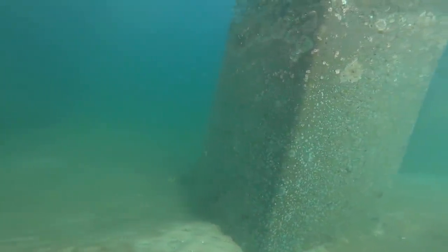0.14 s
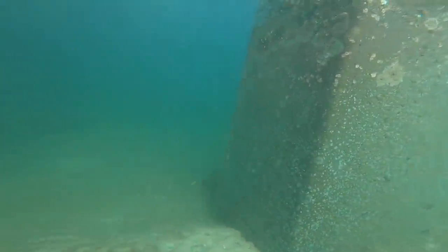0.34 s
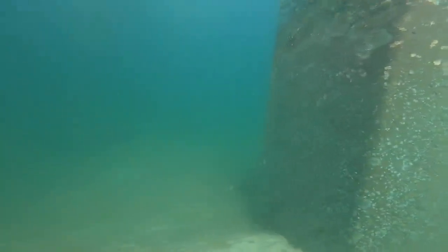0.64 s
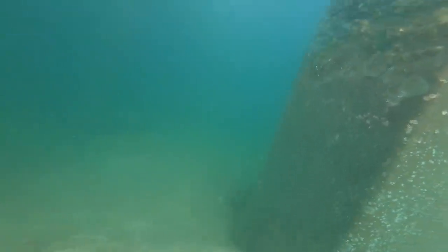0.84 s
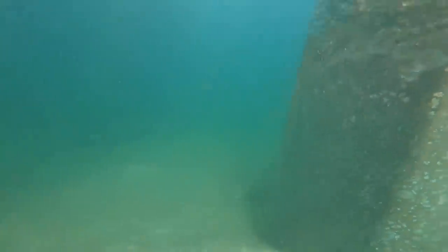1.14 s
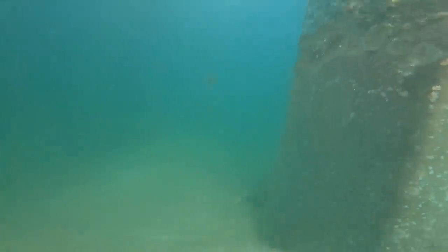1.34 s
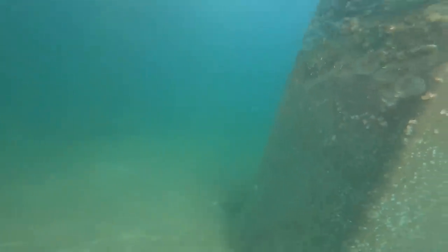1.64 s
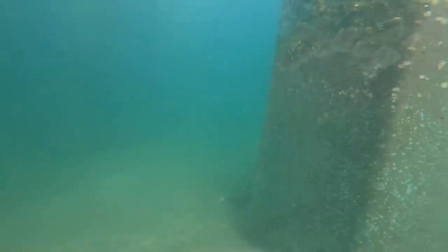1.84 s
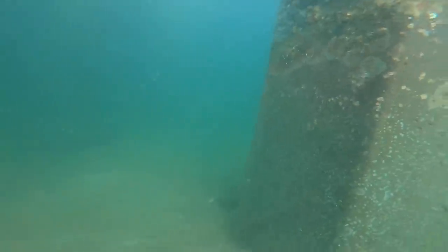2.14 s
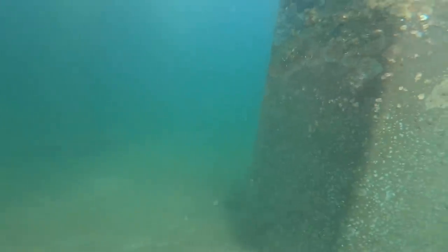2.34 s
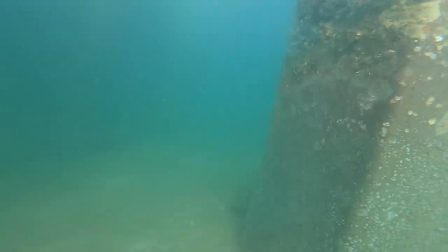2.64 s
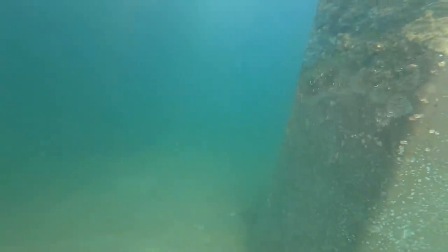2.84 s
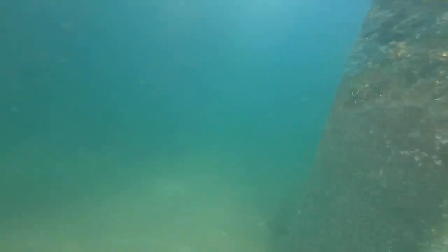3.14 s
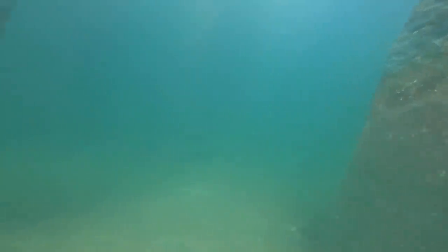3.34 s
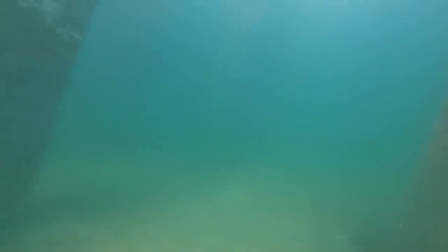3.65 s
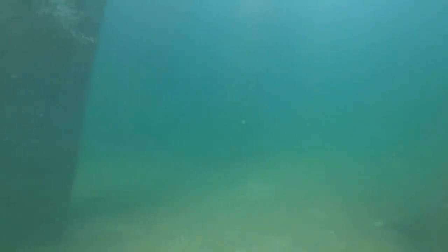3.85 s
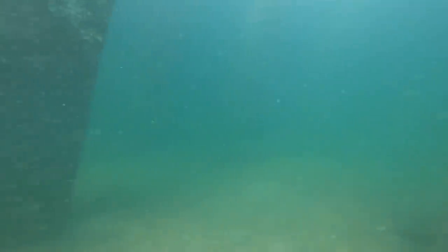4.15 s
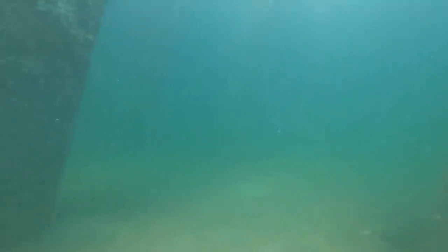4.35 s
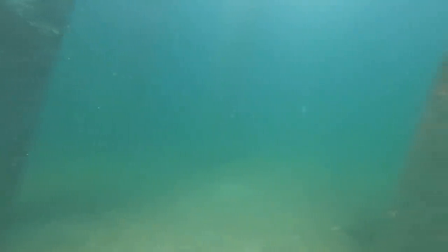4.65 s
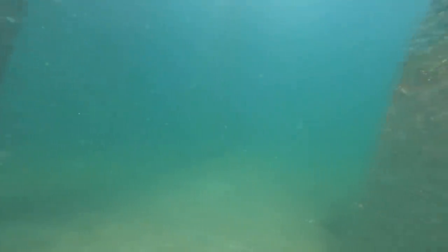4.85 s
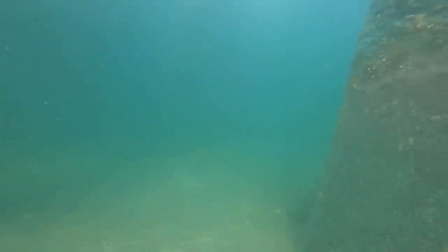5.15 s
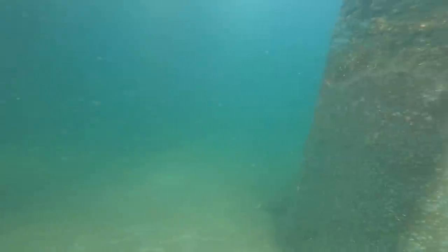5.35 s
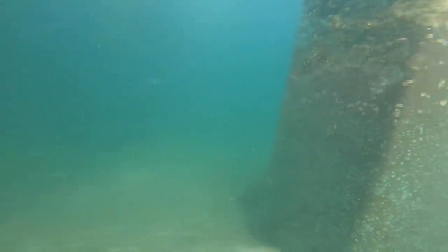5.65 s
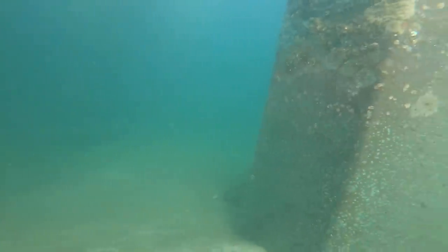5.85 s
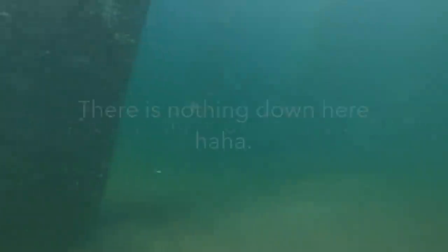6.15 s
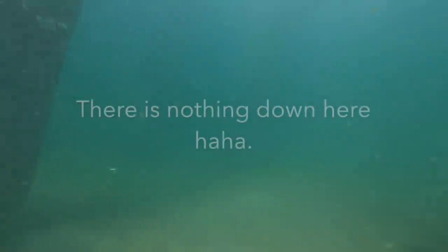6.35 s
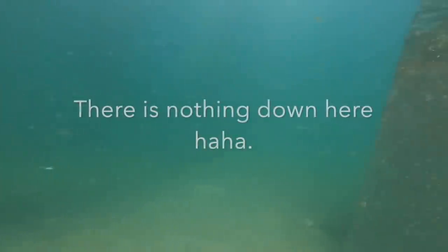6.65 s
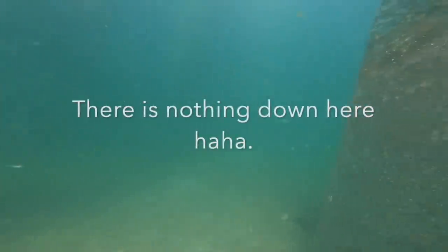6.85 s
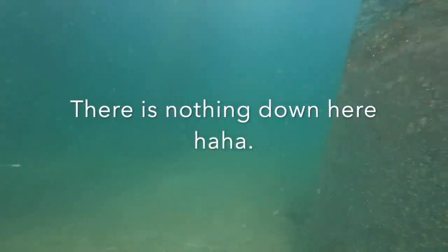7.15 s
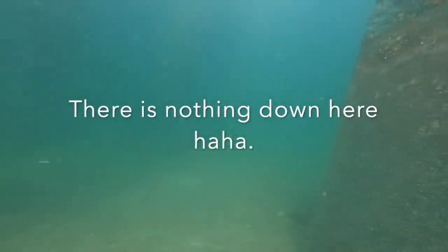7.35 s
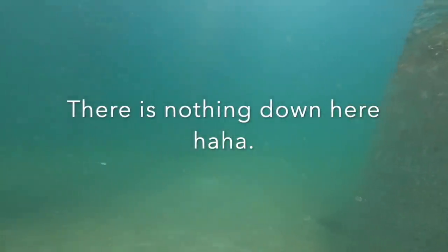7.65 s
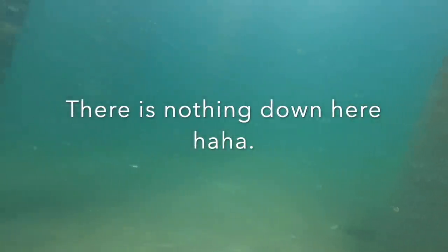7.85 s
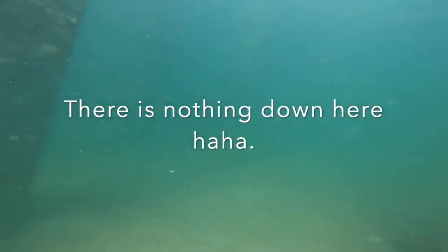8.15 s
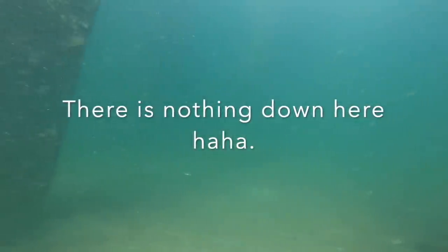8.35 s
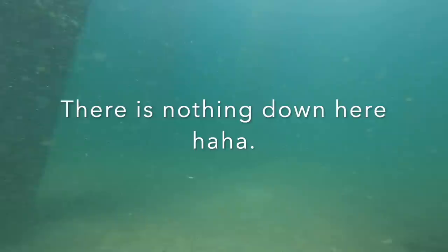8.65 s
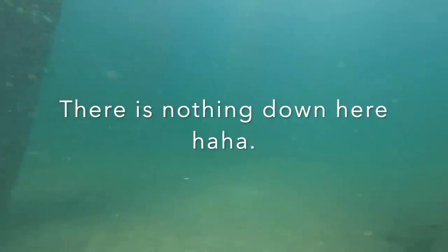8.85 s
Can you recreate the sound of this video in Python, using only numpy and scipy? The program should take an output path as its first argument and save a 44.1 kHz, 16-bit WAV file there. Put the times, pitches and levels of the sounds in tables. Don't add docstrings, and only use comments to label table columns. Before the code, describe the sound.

A submerged camera in a sealed housing picks up continuous shrimp crackle over a dull, mid-heavy hiss. Irregular snaps come close and far, with short watery echoes. Rattling knocks come first, then deep pressure thumps mainly on the left, after which the stereo narrows and slowly reopens. Two strong hollow knocks stand out in the second half, among small low bubble notes, and the crackling carries on to the end.

```python
import sys
import numpy as np
from scipy import signal
from scipy.fft import rfft, irfft, next_fast_len
from scipy.io import wavfile
from scipy.ndimage import uniform_filter1d, map_coordinates

SR = 44100
rng = np.random.default_rng(int(sys.argv[2]) if len(sys.argv) > 2 else 0)


def master(y):
    cut = np.clip(np.atleast_2d(y).T, -1, 1)
    pcm = np.round(cut * 32767)
    wavfile.write(sys.argv[1], SR, pcm.astype(np.int16))


def volts_from_decibels(level):
    exponent = np.asarray(level, float) / 20
    return 10 ** exponent


N = 396900

# time in seconds, hiss level in dB.
COLONY_ACTIVITY = [(0.0, -40), (0.35, -42.5), (0.85, -42), (2.28, -45), (2.83, -42), (3.03, -43.5),
                   (3.51, -41), (4.61, -43.5), (4.86, -40.5), (5.01, -43), (5.97, -44), (6.19, -44.5),
                   (6.59, -43.5), (7.32, -44), (8.75, -40.5), (9.0, -43)]
# frequency in Hz, density in dB per Hz.
HISS_SPECTRUM = [(100, -44.5), (150, -13.5), (300, -15.5), (550, -4.5), (720, 5.5), (850, -9.5),
                 (1000, -18), (1130, -24), (1400, -26), (2000, -37), (4200, -35.5), (5500, -47),
                 (8000, -67.5), (12000, -76)]
SNAP_SPECTRUM = [(100, -34.5), (150, -22), (300, -24), (550, -0.5), (720, 8.5), (850, 1), (1000, -6.5),
                 (1130, -15), (1400, -19.5), (2500, -31), (4200, -31.5), (5500, -54), (8000, -75.5),
                 (12000, -79)]
# frequency in Hz, density in dB per Hz.
KNOCK_SPECTRUM = [(50, -32), (110, -10.5), (250, -7), (450, -8.5), (800, -0.5), (1200, -49.5), (4000, -120)]
PUSH_SPECTRUM = [(10, -15), (30, 6), (60, 0.5), (110, -26), (300, -110)]
BOOM_SPECTRUM = [(40, -44), (70, -5.5), (110, -2), (150, -20.5), (400, -110)]

# peak time in seconds, push in dB, boom in dB, left minus right in dB.
SURGES = [(.08, -76.5, -68, 2.5), (.7, -74, -76, 4.5), (1.03, -70, -76, -6.5), (1.201, -79, -61.5, 13),
          (1.65, -59, -50, 8), (2.51, -89, -75, 18), (2.76, -66, -99, 22), (3.08, -80, -51, 8),
          (3.41, -41.5, -60.5, 22), (3.48, -48, -41, 30), (3.76, -54.5, -67, 13.5), (4.1, -73, -61, 0),
          (4.4, -67.5, -72, 1.5), (5.33, -81, -62.5, -1), (5.7, -80.5, -70, 5), (6.0, -77, -53.5, 9),
          (6.361, -63, -36, 6), (6.47, -62.5, -50.5, 9.5), (6.751, -77.5, -87, -0.5), (7.82, -98, -59, 9)]
# time in seconds, peak in dB, width in seconds, port from 0 left to 1 right.
SHOVES = [
    (.999, -40, 0.0078, 1),
    (2.533, -32, 0.0012, 0),
    (3.432, -25, 0.0054, 0),
    (3.458, -48, .005, 0.26),
    (3.475, -17.5, 0.0046, 0),
    (3.55, -40, .007, 0.16),
    (3.739, -36.5, 0.0045, 0),
]
# start in seconds, peak in dB, pitch in Hz.
BUBBLES = [(0.316, -36.5, 176.5), (0.439, -34, 210), (1.227, -36.5, 148), (3.05, -30.5, 147.5),
           (3.915, -27.5, 187), (4.139, -30, 153.6), (5.915, -34.5, 154), (6.024, -36, 215),
           (7.825, -33.5, 196), (7.917, -26.5, 231), (8.697, -37.5, 184), (8.823, -37.5, 205)]
# start in seconds, peak in dB,
# pitch in Hz, 60 dB decay time in seconds.
KNOCKS = [(1.594, -12.5, 333, 0.04), (1.603, -24.5, 279, 0.066), (1.611, -16, 362, 0.04),
          (1.624, -22, 393.5, 0.05), (1.642, -28, 247, 0.14), (1.646, -31.5, 437, 0.054),
          (1.666, -41, 248, 0.046), (3.061, -28, 343, 0.02), (3.916, -29.5, 402, 0.072),
          (4.003, -24, 375, 0.025), (5.260, -7.5, 453, 0.03), (5.267, -10.5, 450, 0.016),
          (5.282, -17, 285.5, 0.052), (5.296, -19.5, 297, 0.037), (5.305, -22, 242, .05),
          (5.317, -27.5, 306, .04), (5.326, -38, 406, 0.035), (6.3132, -5, 390, 0.024),
          (6.326, -18, 301, 0.032), (6.341, -24.5, 442, 0.06), (6.343, -27, 281, 0.05),
          (6.364, -32.5, 262, 0.029), (6.429, -35.5, 94.2, .3), (7.954, -26, 336, 0.039),
          (8.562, -40, 330, 0.086), (8.9955, -29.5, 412, .06)]

# time in seconds, peak in dB, body in dB re peak, sizzle in dB re peak.
NEAR_SNAPS = [(.8179, -31.5, -0.5, -9.5), (1.4482, -37, 19.5, -8.5), (1.4515, -34.5, 7.5, -11),
              (1.5724, -34.5, -2.5, -5.5), (1.5945, -42, 27.5, -20), (1.6148, -34.5, 7, -7),
              (1.7857, -35, 2, -20), (2.0209, -31.5, 1, -17.5), (2.0434, -32, 5.5, -11.5),
              (2.1523, -35, 7, -11), (2.2795, -30.5, -2, -13.5), (2.4154, -31.5, -3.5, -11),
              (2.499, -35, 8.5, -10), (2.8535, -35.5, 11, -5.5), (4.0965, -28, 6.5, -10.5),
              (4.3204, -38, 17, -2.5), (4.902, -22.5, 2.5, -14), (4.9293, -36, -20, -4),
              (4.9868, -33.5, 5.5, -9.5), (5.2575, -32, 12, -8), (5.971, -26.5, -2, -5.5),
              (6.2093, -35, 5, -15), (6.3084, -33, 14, -5.5), (7.0378, -35, 3.5, 0),
              (7.2724, -36, 9.5, -26.5), (7.3219, -34.5, 10.5, -10), (7.9845, -30.5, 1.5, -2),
              (8.3153, -32.5, 7.5, -5.5), (8.492, -33.5, 9, -12.5), (8.7321, -34, 0.5, -12)]
# time in seconds, sizzle peak in dB, click in dB re sizzle,
# body in dB re click.
OPEN_WATER_CLAWS = [(0.1958, -51, 0.5, 8.5), (0.2788, -62, -4, 8), (0.7062, -47.5, -2.5, 6.5),
                    (1.222, -57, 3.5, 9.5), (1.3178, -53, -1.5, 9), (1.504, -49, 0, 6), (2.1768, -53, 0, 1),
                    (2.5553, -46.5, -3.5, 6), (2.808, -46.5, -1.5, 8), (2.9987, -47.5, -1.5, 9.5),
                    (3.3918, -54, -3.5, 4.5), (3.4153, -52.5, 2.5, 8), (3.5579, -54.5, 3, 5.5),
                    (3.7808, -50.5, -2, 8.5), (3.9409, -50, -4, 6), (4.0778, -50, 2, 4.5),
                    (4.3742, -48, -6.5, 9.5), (4.679, -50, -6, 9), (4.7105, -42.5, -9, 7.5),
                    (4.7947, -42.5, -10, 7.5), (5.392, -52.5, 3.5, 7.5), (5.912, -52, -6.5, 8),
                    (6.1217, -49.5, 0, 3), (6.1404, -48.5, -7, 4), (6.4792, -54.5, -6, 13.5),
                    (7.1631, -60, 6.5, 1.5), (7.8132, -45, -5, 10), (8.5939, -47, -1.5, 4.5),
                    (8.6947, -51, -3, 5.5)]
BURROW_CLAWS = [(0.0314, -56.5, 5.5, 8), (0.1385, -59.5, 10.5, 8.5), (0.8689, -62.5, 6, 9.5),
                (1.0984, -58, 5.5, 8.5), (1.843, -64, 12, 11.5), (1.9959, -55, 8, 8),
                (2.0906, -59.5, 10.5, 7), (2.3582, -66.5, 16.5, 8.5), (2.372, -59.5, 3.5, 10.5),
                (3.0591, -53, 1.5, 11), (3.2445, -63, 11.5, 10.5), (3.265, -61.5, 11, 6.5),
                (3.4476, -54.5, 5.5, 7), (3.6665, -54, 3, 13), (3.7673, -51.5, -0.5, 10.5),
                (3.8304, -54, -1, 4.5), (4.6319, -61.5, 8, 9.5), (4.8617, -65.5, 14.5, 7),
                (5.016, -53.5, 6.5, 9), (6.1881, -52.5, 5.5, 7.5), (7.0756, -60.5, 13.5, 5),
                (7.1092, -57.5, 6.5, 8), (7.418, -64.5, 11, 11.5), (7.7074, -56.5, 6.5, 7.5),
                (7.9275, -53.5, 3, 13), (8.0662, -60.5, 10, 10.5), (8.4316, -69, 21, 9),
                (8.8473, -57, 5.5, 11)]
SMALL_CLAWS = [(0.0917, -56, 7, -5), (0.2214, -52, -5, -3), (0.4798, -57, 3, -1), (0.5426, -54, 0, -6.5),
               (0.7406, -56.5, 7.5, -5), (1.2451, -53, 3.5, -2), (1.9344, -59.5, 3.5, -8),
               (2.3022, -55, 4.5, -3), (2.9704, -57, 10.5, -9), (3.1614, -61, 11, -3.5),
               (3.5049, -65, 7.5, -7.5), (3.8106, -53, 3, -2.5), (3.9779, -51, -6, -1),
               (4.273, -63.5, 7, -6.5), (4.2926, -60, 11.5, -7.5), (4.741, -56, 8.5, -3),
               (4.949, -55.5, 7, -3.5), (5.2185, -61.5, 11.5, -3), (5.3083, -50.5, 2.5, -2.5),
               (5.4358, -61, 3.5, -4), (6.2573, -57, -1, -3), (6.3584, -66, 18, -1.5),
               (6.8603, -50.5, -1, -4), (6.9361, -56, 3, -3), (7.5448, -61, 3.5, -8),
               (7.9024, -54.5, 5.5, -4.5), (8.1586, -58.5, 3.5, -1.5), (8.3883, -52.5, -3, -0.5),
               (8.7745, -54.5, 7, -7), (8.8822, -62, 11, -1)]
DISTANT_CLAWS = [(1.016, -59, 5.5, 12.5), (1.1326, -62, -1, 11.5), (1.1902, -62, 0, 12),
                 (1.4304, -55.5, 2.5, 13), (2.1996, -59, -4.5, 11.5), (2.6708, -57, -6.5, 14),
                 (3.5369, -61, 4.5, 13.5), (3.8896, -73.5, 13, 18), (4.0224, -59, 3, 11.5),
                 (4.2518, -63.5, 4, 13), (4.4817, -62.5, -11.5, 14.5), (4.7602, -58, 5, 15),
                 (5.0833, -56.5, -5, 10.5), (5.2054, -62, 5.5, 14.5), (5.4737, -66.5, 5, 8.5),
                 (5.5263, -73, 12.5, 12.5), (5.5917, -61, 0, 16), (5.6943, -64.5, 4, 11),
                 (5.75, -67, 0, 11), (5.7967, -64, 2.5, 8), (5.8778, -68.5, -0.5, 13.5),
                 (6.0292, -55.5, -3.5, 12), (6.6233, -62.5, 6, 10.5), (6.7196, -60, -4, 11.5),
                 (7.3824, -69.5, 15, 15.5), (7.4909, -68, 6.5, 10.5), (7.604, -70, 11, 10),
                 (7.7542, -64, 7, 3), (8.2481, -55.5, -1, 17), (8.5405, -53.5, -4.5, 9.5)]
HIGH_TICKS = [(0.5151, -70.5, 12.5, 2), (0.6848, -55, 2, 2.5), (1.1797, -62.5, 0, 8),
              (1.701, -62.5, -3.5, -1), (1.9632, -63, 8, 2.5), (2.23, -65, -10.5, 3),
              (2.2589, -55, 5.5, 5.5), (2.7752, -64, 9, 2), (4.1353, -57, -3, 6), (4.3967, -64, -10, 9),
              (4.567, -69, 5, -2), (4.6646, -53, -3.5, 2), (4.6864, -52, -2.5, -2.5),
              (5.1653, -60.5, -3, 6.5), (5.5834, -63, -1, 3), (6.0416, -55.5, -3, 3.5),
              (6.1655, -55.5, 5.5, 4), (6.2243, -63, 9.5, 0), (6.2711, -66, 17.5, 7), (6.547, -69, 8, 0),
              (6.8047, -68.5, 6.5, 4), (6.9636, -61.5, -6, 1), (7.2601, -64.5, 9.5, 7.5),
              (7.3532, -61.5, 5, 2.5), (7.4365, -63, 3, -3), (8.0481, -64.5, 5.5, 5), (8.516, -58.5, 1, 7),
              (8.6732, -51, -6, 6)]
SCATTERED_CLAWS = [(.0014, -65, 8.5, 4), (.4105, -72, -1, 3.5), (3.4, -62.5, -1.5, 1.5),
                   (3.3282, -71.5, 2.5, -0.5), (4, -56, -1.5, 4), (4.3642, -62, -2.5, 1),
                   (4.5096, -65.5, -5, -1), (4.5999, -66.5, -1, 2.5), (3.6, -55.5, -5, 4),
                   (4.8116, -60, -4.5, 2), (1.237, -58, 3, -1.5), (5.4444, -60.5, -6.5, 2),
                   (5.606, -66.5, 8, 6), (5.9239, -53.5, -4.5, 2.5), (6.2424, -58, 2, -2),
                   (6.3208, -45.5, -3, 1.3), (7.5094, -68.5, 7.5, 3.5), (7.5604, -58, 0.5, -1.5),
                   (7.7, -58, 6, 9.5), (7.9769, -46, 1, -2), (8.8624, -62, 8.5, 3.5),
                   (8.979, -68.5, -1.5, -1), (7.9663, -58.5, -1.5, 8), (4.877, -61, 10, 11.5),
                   (8.9945, -62.5, 13.5, 8.5), (1.262, -56, 3, -1), (6.4662, -60, 3, 6.5),
                   (4.7, -60.5, -2.5, -6.5), (5.8, -61, -1, -4.5), (0.22, -66, 6.5, -2)]

# frequency in Hz, gain in dB.
LEFT_GAIN = [(90, 2.5), (250, 13), (440, 20.5), (560, 8.5), (900, -6.5), (1080, -4), (1450, -6),
             (1580, -20.5), (2000, -3), (2400, -6.5), (2550, -14), (3400, -5.5), (4600, -16.5), (5800, 0)]
# frequency in Hz, phase in radians.
LEFT_PHASE = [(90, .45), (350, -1.1), (550, -3.7), (900, -5), (1020, -6.6), (1150, -9.8), (1550, -12.4),
              (1660, -10.9), (2480, -12.6), (2600, -11.4), (3100, -10.6), (4400, -10.7), (4900, -12.6),
              (6000, -12.6)]
# frequency in Hz, phase given to the left in radians.
GUARD_ALIGNMENT = [(150, 0.12), (500, 0.59), (640, 1.54), (720, 2.14), (820, 1.25), (1100, -1), (3500, 0.2),
                   (5000, 1.5)]


def unit(x):
    return x / np.sqrt(np.mean(x ** 2) + 1e-20)


def unit_gain(h):
    return h / np.sqrt(np.mean(np.abs(h) ** 2))


def along(points, hz):
    f, v = np.transpose(points)
    return np.interp(np.log(hz + 1), np.log(f + 1), v)


def wobble(rate):
    knots = rng.standard_normal(int(N * rate / SR) + 4)
    return map_coordinates(knots, [np.arange(N) * rate / SR])


def filtered(x, response):
    m = 2 * next_fast_len(N // 2 + SR // 4)
    return irfft(rfft(x, m) * response(np.fft.rfftfreq(m, 1 / SR)), m)[..., :N]


def causal(spectrum):
    def response(hz):
        cepstrum = irfft(np.log(volts_from_decibels(along(spectrum, hz)) + 1e-6))
        cepstrum[1:len(hz) - 1] *= 2
        cepstrum[len(hz):] = 0
        return unit_gain(np.exp(rfft(cepstrum)))
    return response


def noise(spectrum):
    return unit(filtered(rng.standard_normal(N), lambda hz: volts_from_decibels(along(spectrum, hz))))


def low_pass(hz, corner_hz):
    s = 1j * hz / corner_hz
    return 1 / (1 + np.sqrt(2) * s + s * s) ** 2


def high_pass(hz, mirror_hz, corner_hz):
    return low_pass(mirror_hz ** 2 / (hz + 1), corner_hz).conj()


def sea():
    seconds, activity_db = np.transpose(COLONY_ACTIVITY)
    hiss_db = np.interp(np.arange(N) / SR, seconds, activity_db)
    crackle_db = -77 + 0.8 * (hiss_db - hiss_db.mean())

    t = np.arange(SR // 10) / SR
    arrivals = rng.random((2, N)) < 90 / SR
    ticks = arrivals * volts_from_decibels(6.5 * rng.exponential(size=(2, N)))
    smear = signal.fftconvolve(ticks, volts_from_decibels(-60 * t / 0.05)[None])[:, :N]

    def crackle_colour(hz):
        dull = low_pass(hz, corner_hz=2700)
        return causal(HISS_SPECTRUM)(hz) * (hz > 1050) * np.array([dull, 1 - dull])

    def hiss_tilt(hz):
        return volts_from_decibels(-1) + (1 - volts_from_decibels(-9.5)) * abs(low_pass(hz, corner_hz=1330))

    crackle = unit(filtered((smear + .35) * rng.standard_normal((2, N)), crackle_colour).sum(0))
    swell = volts_from_decibels(1.5 * wobble(14) + 1.2 * wobble(45))
    hiss = unit(swell * filtered(noise(HISS_SPECTRUM), hiss_tilt))
    return volts_from_decibels(hiss_db - 3.5) * hiss + volts_from_decibels(crackle_db + 4.0) * crackle


def surges():
    rise_db_s, fall_db_s = 221.5, np.array([[84.5], [149.5]])
    calm_db = np.array([-88, -91.5]) - 0.5
    t = np.arange(0, N, 64) / SR
    gain = volts_from_decibels(calm_db)[:, None, None] * np.ones((2, 2, len(t)))
    for s, push_db, boom_db, pan_db in SURGES:
        slope = np.where(t < s, -rise_db_s, fall_db_s)
        level = volts_from_decibels(np.array([[push_db], [boom_db]]) - slope * (t - s))
        gain = gain + level[:, None] / (1 + volts_from_decibels(np.array([[-pan_db], [pan_db]])))
    return np.repeat(gain, 64, axis=2)[..., :N]


def flow():
    push_gain, boom_gain = uniform_filter1d(surges(), size=128)
    push = volts_from_decibels(4.0) * push_gain * np.array([noise(PUSH_SPECTRUM), noise(PUSH_SPECTRUM)])
    for s, db, width, port in SHOVES:
        near = slice(round(s * SR) - 2048, round(s * SR) + 2048)
        u = ((np.arange(N)[near] / SR - s) / width) ** 2
        share = np.clip([[1 - port], [port]], 0, 1)
        push[:, near] -= volts_from_decibels(db) * (1 - u) * np.exp(-u / 2) * share
    return push + volts_from_decibels(-0.5) * boom_gain * noise(BOOM_SPECTRUM)


def bubbles():
    t = np.arange(SR // 5) / SR
    onset = 1 - np.exp(-(t / 0.0028) ** 2)
    out = np.zeros(N + SR)
    for s, db, hz in BUBBLES:
        ring = np.sin(2 * np.pi * hz * t * (1 + 0.72 * t))
        out[round(s * SR):][:len(t)] += volts_from_decibels(db - 6.5 - 60 * t / 0.082) * onset * ring
    return out[:N]


def knocks():
    t = np.arange(SR // 3) / SR
    rise = 1 - np.exp(-(t / 0.0023) ** 2)
    flex, rumble = np.zeros(N + SR), np.zeros(N + SR)
    for s, db, hz, t60 in KNOCKS:
        start = round(s * SR)
        flex[start:][:len(t)] += volts_from_decibels(db - 7.5 - 60 * t / t60) * rise * np.sin(2 * np.pi * hz * t)
        rumble[start:][:len(t)] += volts_from_decibels(db - 18.5 - 60 * t / 0.21) * rise * rng.standard_normal(len(t))
    return flex[:N] + filtered(rumble[:N], causal(KNOCK_SPECTRUM))


def all_snaps():
    click_source_db, sizzle_source_db = 11, -2
    rows = list(NEAR_SNAPS)
    for kind in (OPEN_WATER_CLAWS, BURROW_CLAWS, SMALL_CLAWS, DISTANT_CLAWS, HIGH_TICKS, SCATTERED_CLAWS):
        for s, db, click_db, body_db in kind:
            rows.append((s, db + click_db + click_source_db, body_db, sizzle_source_db - click_db))
    return rows


def snap_bands(hz):
    colour = causal(SNAP_SPECTRUM)(hz)
    body = low_pass(hz, corner_hz=965)
    click = high_pass(hz, 1100, corner_hz=1058) * low_pass(hz, corner_hz=2900)
    sizzle = high_pass(hz, 3400, corner_hz=3150)
    return np.array([unit_gain(colour * band) for band in (body, click, sizzle)])


def snaps():
    t = np.arange(SR // 7) / SR
    bands = np.zeros((3, N + SR))
    echo_db = np.array([[-11], [-10.5], [-9.5]]) - 60 * t / 0.14
    for s, db, body_db, sizzle_db in all_snaps():
        steps = np.repeat(rng.standard_normal((3, 64)), 180, axis=1)[:, :len(t)]
        lumps = volts_from_decibels(5.0 * uniform_filter1d(steps, size=90))
        echoes = volts_from_decibels(echo_db) * (1 - np.exp(-t / 0.005)) * lumps

        near = np.clip((db + 53.0) / 24, 0, 1)
        spray_t60 = (.06 - 0.025 * near) * np.array([[1.05], [.6], [.35]])
        spray = volts_from_decibels(-60 * t / spray_t60) * (1 - np.exp(-(t + 1e-4) / (.002 - .0018 * near)))
        burst = (spray + echoes) * rng.standard_normal((3, len(t)))

        ring_hz = np.array([[1892], [4120]]) * np.exp(.3 * rng.standard_normal((2, 1)))
        ring_t = t[:2048]
        burst[1:, :2048] += volts_from_decibels(-11 - 60 * ring_t / .018) * np.sin(2 * np.pi * ring_hz * ring_t)
        burst[:, 0] = volts_from_decibels(np.array([21, 10, 8.5]) + 8.38 * near)

        late = round(SR * (.003 + 0.014 * rng.random()))
        bounce_db = -15.5 + 5.1 * rng.standard_normal((2, 1))
        burst[1:, late:late + 512] += volts_from_decibels(bounce_db) * burst[1:, :512]

        level_db = db + np.array([[body_db - 10.5], [1.5], [sizzle_db - 7.0]])
        bands[:, round(s * SR) + 60:][:, :len(t)] += volts_from_decibels(level_db) * burst
    return filtered(bands[:, :N], snap_bands).sum(0)


def wall(hz):
    return low_pass(hz, corner_hz=6260) * high_pass(hz, 100, corner_hz=101)


def left_cavity(hz):
    return volts_from_decibels(along(LEFT_GAIN, hz)) * np.exp(1j * along(LEFT_PHASE, hz))


def scene():
    right = filtered(snaps() + sea() + knocks() + bubbles(), wall)
    left = filtered(right, left_cavity)
    return np.array([left, right]) + flow()


def guard():
    s = 3.693 + np.cumsum([0, 0.45, 0.1, 2.53])
    return np.interp(np.arange(N) / SR, s, [0.082, 0.53, 0.53, 0.082])


def top_cut(x):
    return signal.sosfilt(signal.butter(12, 15600, fs=SR, output="sos"), x)


def record(dry):
    share = np.clip(guard(), 0, .5)

    def align(hz):
        return np.exp(1j * np.array([[1], [-1]]) * along(GUARD_ALIGNMENT, hz))

    def brighten(hz):
        return volts_from_decibels(along([(4000, -25.0), (5000, 4.5), (6000, 7.5), (8000, 22.5), (11000, 8.0)], hz))

    across = filtered(dry, align)[::-1]
    bright = filtered(dry[0] + .8 * dry[1], brighten)
    blend = across + volts_from_decibels(np.array([[3], [-2.5]])) * bright
    hum_free_noise = volts_from_decibels(-101) * rng.standard_normal(dry.shape)
    mixed = (1 - share) * dry + share * blend + hum_free_noise
    return top_cut(mixed)


dry = scene()
out = record(dry)
master(out)
```